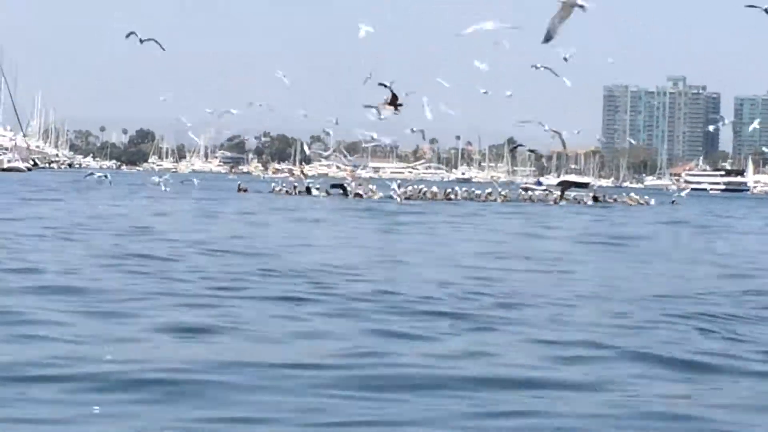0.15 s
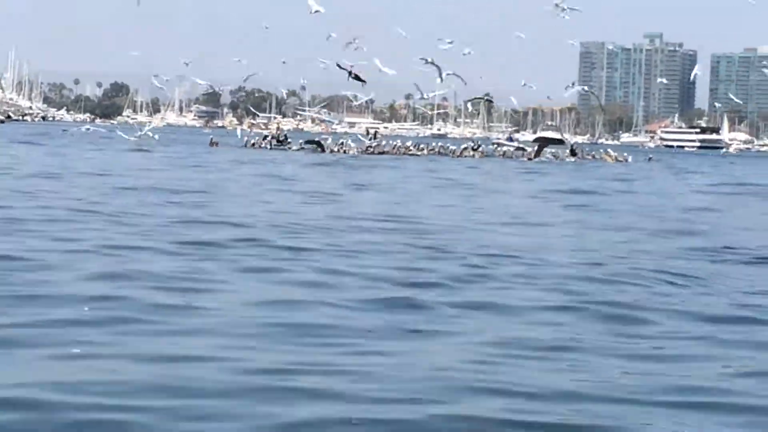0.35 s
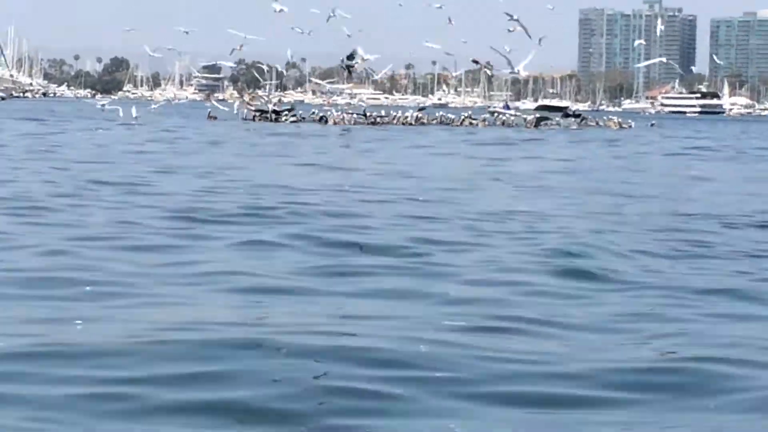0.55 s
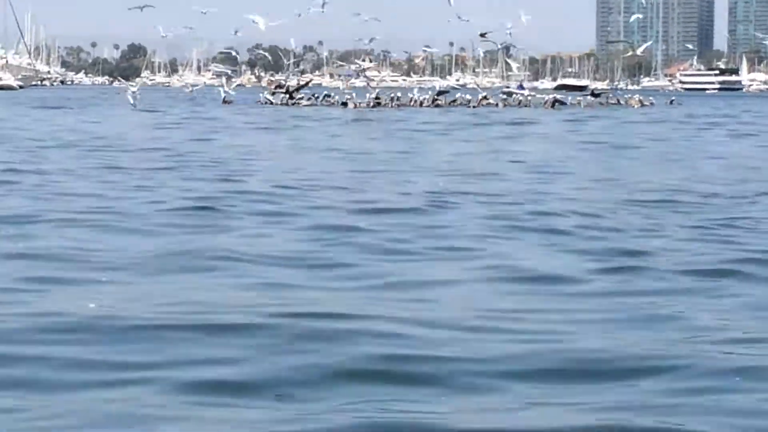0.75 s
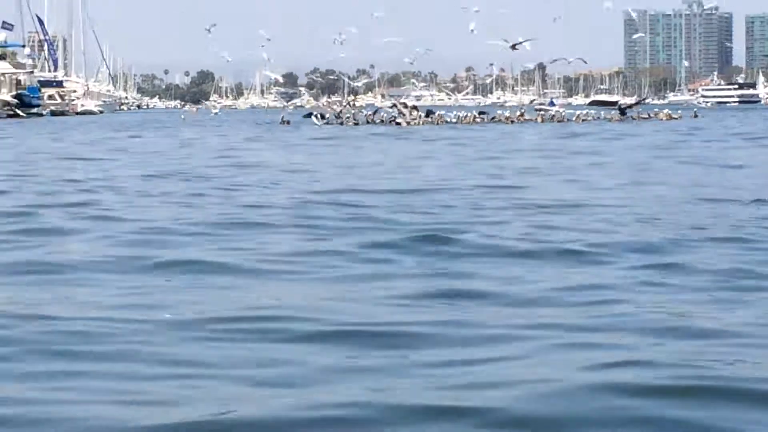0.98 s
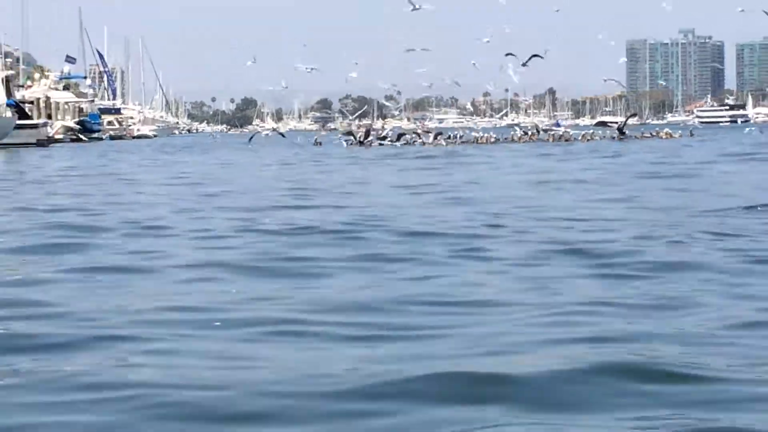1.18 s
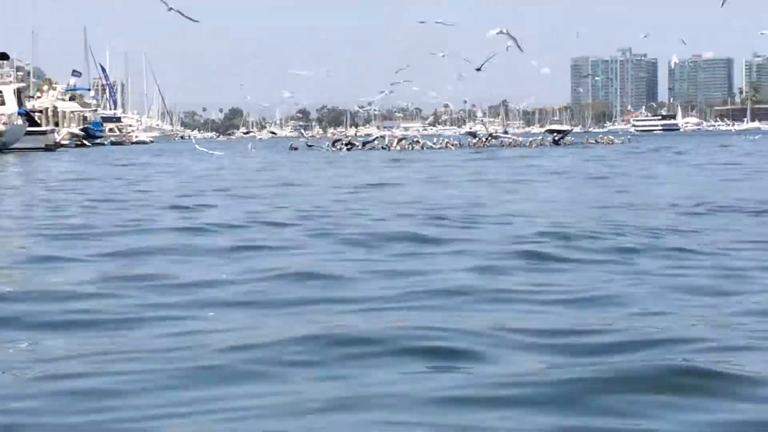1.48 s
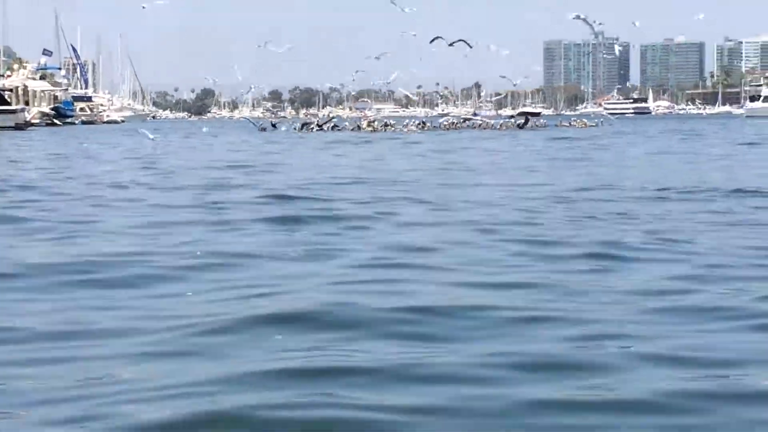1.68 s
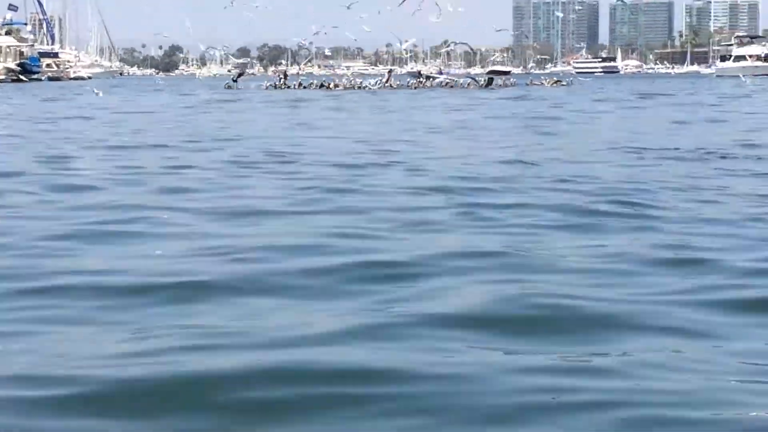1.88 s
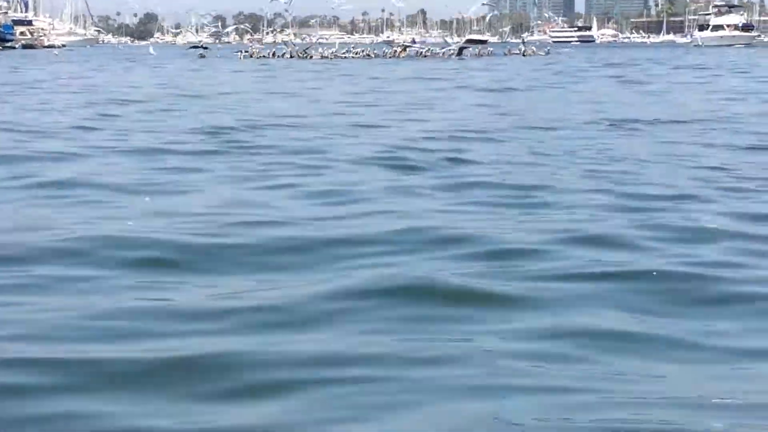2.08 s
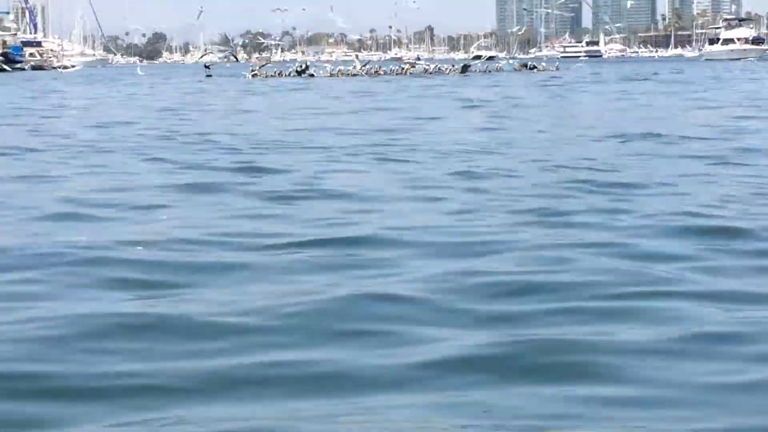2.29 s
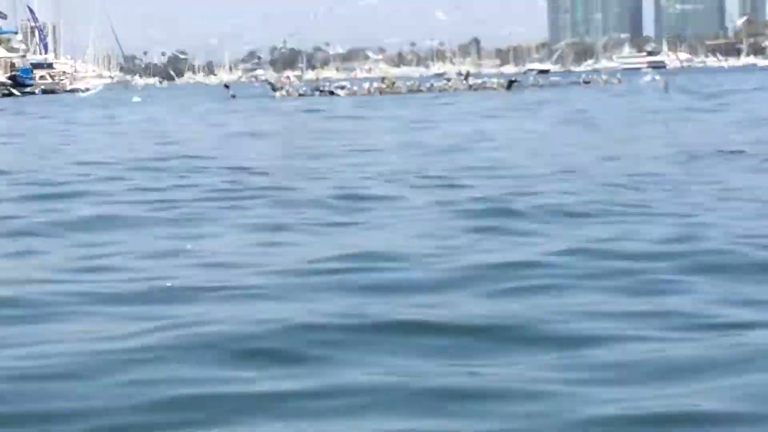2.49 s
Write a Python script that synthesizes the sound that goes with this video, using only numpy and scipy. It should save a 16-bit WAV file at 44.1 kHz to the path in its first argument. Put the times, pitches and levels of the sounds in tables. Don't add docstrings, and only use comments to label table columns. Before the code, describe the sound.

Gulls and terns squawk and chirp in a busy crowd above lapping water and buffeting wind

```python
import sys
import numpy as np
from scipy import signal
from scipy.io import wavfile
from scipy.ndimage import uniform_filter1d

SR = 44100
rng = np.random.default_rng(int(sys.argv[2]) if len(sys.argv) > 2 else 0)


def ratio_of_db(decibels):
    return 10 ** (np.asarray(decibels, float) / 20)


def transcribe(u):
    v = np.clip(np.atleast_2d(u).T, -1, 1)
    q = np.round(v * 32767).astype(np.int16)
    wavfile.write(sys.argv[1], SR, q)


N = 116865
QUICK_EDGE_S = 0.002024
ARCH_PER_S2 = 170

# start in seconds, length in seconds, pitch in Hz, level in dB,
# beak resonance in Hz.
ARCHED_CRIES = [(0.062, 0.048, 1180, -52.5, 6160), (0.51, 0.06, 2618, -41, 5250),
                (0.742, 0.035, 1341, -33.5, 5470), (0.911, 0.046, 1225, -42, 3800),
                (1.139, 0.039, 2720, -36, 5000), (1.312, 0.054, 1190, -38.5, 3550),
                (1.343, 0.06, 2600, -38.5, 5250), (2.143, 0.056, 1150, -45.5, 3400),
                (2.414, 0.054, 1280, -51, 3850), (2.489, 0.032, 2620, -35, 4860),
                (2.629, 0.057, 1270, -52.5, 8350)]
# start in seconds, length in seconds, pitch in Hz, level in dB,
# beak resonance in Hz.
HOARSE_WAILS = [(0.192, 0.096, 1450, -41.5, 3935), (1.303, 0.033, 1300, -47.5, 4200),
                (2.2, 0.019, 1500, -43, 4000), (1.992, 0.0468, 2433, -35.5, 5650),
                (2.53, 0.0477, 1200, -54.5, 5200), (1.732, 0.03, 1330, -44.5, 2740),
                (.155, 0.038, 1440, -50.5, 2900), (0.5, 0.039, 2400, -58, 2900),
                (1.1, 0.062, 1600, -52, 1330), (1.85, 0.071, 1300, -41.5, 4800),
                (1.9, 0.095, 1242, -43, 3800)]
# start in seconds, length in seconds, pitch in Hz,
# level in dB, beak resonance in Hz.
HELD_NOTES = [(0, 0.018, 1280, -49.5, 4100), (0.378, 0.017, 3180, -52, 3200),
              (0.154, 0.0284, 1409, -42, 4300), (0.247, 0.067, 1398, -48, 3700),
              (0.283, 0.057, 2730, -53, 5200), (1.416, 0.041, 2440, -45, 3970),
              (1.527, 0.043, 2770, -45, 5600), (1.579, 0.047, 1204, -40.5, 4470),
              (1.628, 0.095, 1452, -55.5, 5260), (1.869, 0.026, 1326, -31, 3530),
              (1.925, 0.034, 2512, -29.5, 2730), (2.299, 0.052, 2600, -40, 4640)]
# start in seconds, length in seconds, pitch in Hz, level in dB,
# beak resonance in Hz.
FALLING_GLIDES = [(0.412, 0.017, 3040, -46, 3300), (0.758, 0.023, 1344, -35.5, 4050),
                  (1.33, 0.021, 1340, -34.5, 4060), (1.395, 0.019, 2325, -40, 3840),
                  (1.478, 0.026, 2430, -38.5, 4760), (1.492, 0.02, 1169, -35.5, 3560),
                  (1.495, 0.011, 2820, -40.5, 5450), (1.572, 0.022, 2640, -51, 4500),
                  (1.814, 0.022, 1193, -32, 2650), (1.852, 0.018, 1182, -32, 2500),
                  (1.94, 0.032, 1213, -37, 3250), (1.944, 0.0233, 3050, -46.5, 6100),
                  (2.046, 0.021, 1040, -42, 3280), (2.208, 0.013, 1216, -33.5, 4700),
                  (2.338, 0.017, 1115, -37, 3840), (2.37, 0.017, 2290, -39.5, 3660),
                  (2.512, 0.021, 1169, -40, 3830)]
# start in seconds, length in seconds, pitch in Hz, level in dB,
# beak resonance in Hz.
RISING_GLIDES = [(0.57, 0.0093, 1310, -40.5, 4970), (1.273, 0.0088, 1080, -41.5, 3180),
                 (1.292, 0.0069, 1260, -39, 3800), (1.31, 0.012, 1365, -38, 4140),
                 (1.37, 0.011, 1282, -32.5, 3850), (1.41, 0.0072, 1147, -30.5, 3430),
                 (1.455, 0.027, 2850, -48, 5660), (1.785, 0.013, 1268, -38.5, 2440),
                 (2.182, 0.016, 1312, -37.5, 4300), (2.28, 0.0096, 1117, -37, 3940),
                 (2.315, 0.021, 1274, -36.5, 4450)]
# start in seconds, pitch in Hz, level in dB, beak resonance in Hz.
PIPS = [(0.127, 1310, -43, 4070), (.269, 1220, -48, 3700), (.313, 1186, -47, 2410),
        (.339, 1230, -49, 3600), (1.26, 2160, -50, 2180), (0.14, 1444, -45, 4370),
        (0.591, 2500, -34.5, 5030), (0.624, 2348, -36.5, 4020), (0.654, 2173, -36, 2450),
        (0.677, 2144, -35, 2400), (0.703, 1240, -42, 4930), (0.726, 1117, -40.5, 4240),
        (0.782, 1150, -41, 4360), (1.355, 2160, -40, 3130), (1.387, 1210, -43, 3720),
        (1.428, 1166, -38, 3540), (1.448, 1212, -41, 4160), (1.459, 1168, -33, 3700),
        (1.512, 1137, -39.5, 3280), (1.544, 1168, -37, 3650), (1.56, 1110, -37, 2950),
             (1.623, 1121, -39, 3500), (1.64, 1112, -46, 4250), (1.68, 1347, -48, 5160),
             (1.698, 1290, -41.5, 4340), (1.722, 1377, -47.5, 5460), (1.785, 1966, -42, 2090),
             (1.824, 1980, -36, 1950), (1.86, 1940, -39, 1950), (2.037, 2305, -43, 4700),
             (2.244, 1127, -49, 3500), (1.836, 1234, -31, 2730), (1.897, 2207, -27, 2370),
             (1.916, 2400, -27, 3380), (1.973, 2304, -25.5, 2860), (2.229, 1170, -34, 3180),
             (2.261, 1196, -33.5, 4450), (2.351, 1268, -35, 4530), (2.405, 2160, -40.5, 3100),
             (2.429, 2067, -42, 2880), (2.454, 2200, -42.5, 2950), (2.474, 1222, -39, 4200)]
# frequency in Hz, gain in dB.
THROAT_RESPONSE = [(1000, -9.5), (2000, 3), (5500, 5), (6300, -2), (15000, -13)]
# frequency in Hz, level in dB.
WASH_SPECTRUM = [(170, -18), (300, -0.5), (830, -15), (2100, -18), (9000, -33), (15400, -45)]
# start in seconds, peak in dB, pitch in Hz.
PLOPS = [(0.123, -29, 705), (0.475, -23.5, 920), (0.483, -25, 793), (1.023, -35.5, 970), (1.134, -32, 1590),
         (.34, -33, 1290), (0.367, -35.5, 1520), (.96, -34.5, 1170), (1.746, -36, 910), (2.198, -27, 610),
         (.81, -33.5, 700)]
# start in seconds, peak in dB.
SPRAY_TICKS = [(.115, -48), (.1251, -39), (.37, -47), (.451, -43), (.859, -49), (.984, -45), (.999, -50),
               (1.017, -48), (1.0312, -41), (1.063, -49), (1.092, -49), (1.108, -44), (1.135, -45),
               (2.135, -49), (2.423, -47)]
# time in seconds, gust level in dB.
WIND_GUSTS = [(0, -37.5), (.23, -39), (.29, -29.5), (.47, -38.5), (0.508, -30.5), (.56, -37), (.84, -30),
              (.97, -38.5), (1.519, -38), (1.8, -30), (1.95, -25.5), (2.05, -36.5), (2.24, -33.5),
              (2.4, -41)]
# frequency in Hz, level in dB.
RUMBLE_SPECTRUM = [(20, -28), (74, 1.5), (195, -1.5), (900, -41.5)]
# start in seconds, peak in dB, pitch in Hz.
WIND_BUFFETS = [(0.161, -37, 150), (0.27, -27, 132.4), (0.496, -25, 108), (0.59, -27.5, 183),
                (0.651, -27, 131), (1.052, -32, 145), (1.287, -29, 104.4), (1.358, -32, 104),
                (1.429, -31.5, 91.5), (1.596, -26, 142), (1.925, -15.5, 125), (2.198, -25.5, 90),
                (2.562, -33, 96.9),
                (0.701, -28.5, 260),
    (0.724, -23, 246),
    (1.629, -40, 198),
    (1.72, -33, 199),
    (1.77, -26, 170),
    (1.94, -25.5, 149),
]


def evened(x):
    return x / np.sqrt(np.mean(x ** 2) + 1e-20)


def read(points, hz):
    f, value = np.transpose(points)
    return np.interp(np.log(hz + 1), np.log(f + 1), value)


def add(mix, start_s, sound):
    part = mix[round(start_s * SR):][:len(sound)]
    part += sound[:len(part)]


def drift(count, size):
    smooth = uniform_filter1d(rng.standard_normal(count), size)
    return uniform_filter1d(smooth, size) * np.sqrt(1.5 * size)


def band(x, lo_hz, hi_hz):
    sos = signal.butter(2, [lo_hz, min(hi_hz, 20000)], "band", fs=SR, output="sos")
    return signal.sosfilt(sos, x)


def noise(points, patchy_db, flicker_db, size):
    frames, hz = 4 * N // size + 5, np.fft.rfftfreq(size, 1 / SR)
    a, b, patches = rng.standard_normal((frames, len(hz), 3)).T
    patches = uniform_filter1d(patches, size=8, axis=0)
    patches = evened(uniform_filter1d(patches, size=6, axis=1))
    flicker = evened(uniform_filter1d(rng.standard_normal(frames), size=3))
    level_db = read(points, hz)[:, None] + patchy_db * patches + flicker_db * flicker
    z = (a + 1j * b) * ratio_of_db(level_db)
    return evened(signal.istft(z, nperseg=size, noverlap=3 * size // 4)[1][:N])


def note(length, hz, db, mouth_hz, arch=0., droop=0., slide=0., edge_s=QUICK_EDGE_S,
         breath_db=-11, rough=1, above_db=-11, mouth_db=6.5):
    wobble, flutter, rasp = (drift(count=4410, size=s) for s in (160, 90, 14))
    air = signal.lfilter([1, -1], [1, -.6], rng.standard_normal(4410))
    t = np.arange(0, min(length + edge_s, .1), 1 / SR) - edge_s / 2
    n = len(t)
    from_middle = t - length / 2

    bend = 1 - arch * from_middle ** 2 + slide * from_middle
    bend = bend - droop * (np.clip(t / length, 0, 2) ** 5 - .1)
    pitch = hz * (bend + rough * 0.0146 * wobble[:n])
    phase = 2 * np.pi * np.cumsum(pitch) / SR

    k = np.arange(1, 13)[:, None]
    octaves = np.log2(k * hz / mouth_hz)
    beak_db = mouth_db * np.exp(-(octaves / 0.19) ** 2) + above_db * np.maximum(octaves, 0)
    heights = ratio_of_db(read(THROAT_RESPONSE, k * pitch) + beak_db) * (k * pitch < 16000)
    stack = (heights * np.cos(k * phase + rng.uniform(0, 5.44, k.shape))).sum(0)

    ramp = np.minimum(t - t[0], (t[-1] - t) / 1.65) / edge_s
    shape = np.sin(np.pi / 2 * np.clip(ramp, 0, 1))
    breath = ratio_of_db(breath_db) * band(air, mouth_hz / 2, 2 * mouth_hz)[:n]
    voice = evened(stack) * (1 + rough * 0.25 * rasp[:n]) + breath
    return ratio_of_db(db + rough * 3 * flutter[:n]) * shape * voice


def flock():
    mix = np.zeros(N)
    for start, length, *voice in ARCHED_CRIES:
        cry = note(length, *voice, mouth_db=12, arch=ARCH_PER_S2, edge_s=.8 * length / 2, rough=.3,
                   breath_db=-23, above_db=-4)
        add(mix, start - .09 * length, cry)
    for start, *voice in HOARSE_WAILS:
        add(mix, start, note(*voice, arch=60, edge_s=0.0052, rough=.7, breath_db=-23))
    for start, *voice in HELD_NOTES:
        add(mix, start, note(*voice, droop=0.084, rough=.6, edge_s=0.0065, breath_db=-50))
    for table, slide in ((FALLING_GLIDES, -6.5), (RISING_GLIDES, 7.6)):
        for start, *voice in table:
            add(mix, start, note(*voice, slide=slide))
    for start, *voice in PIPS:
        add(mix, start, note(0.011, *voice, slide=-2.5))
    return np.roll(mix, -round(QUICK_EDGE_S / 2 * SR))


def crowd():
    mix = np.zeros(N)
    birds, birds_per_s, crowd_db = 120, 53, -61.5
    for when, long, high, loud, wide in rng.random((birds, 5)):
        length = 0.01 + 0.0511 * long ** 2
        cry = note(length, 1100 + 350 * high, crowd_db + 6 * (loud - .5), 2300 + 2500 * wide,
                   arch=ARCH_PER_S2, edge_s=0.0055)
        add(mix, when * birds / birds_per_s, cry)
    return mix


def open_water(x):
    t60_s, echo_db = 0.22, -8.5
    t = np.arange(SR // 3) / SR
    sparse = rng.standard_normal(len(t)) * (rng.random(len(t)) < .05)
    taps = sparse * ratio_of_db(-60 * t / t60_s) * (t > .002)
    echoes = signal.fftconvolve(band(x, 900, 3800), taps / np.linalg.norm(taps))[:N]
    return x + ratio_of_db(echo_db) * echoes


def splash():
    u = np.linspace(0, 1, round(.07 * SR))
    grains = rng.standard_normal((2, 4410)) * ratio_of_db(5 * drift(count=4410, size=60))
    slosh = evened(band(grains[0], 420, 2900))[:len(u)]
    fizz = evened(band(grains[1], 4900, 9500))[:len(u)]
    return ratio_of_db(-41) * np.sin(np.pi * u) ** 0.22 * slosh + ratio_of_db(-47) * np.sin(np.pi * u ** 2) ** 2 * fizz


def water():
    mix = ratio_of_db(-45.5) * noise(WASH_SPECTRUM, patchy_db=3.5, flicker_db=1.1, size=512)
    t = np.arange(600) / SR
    for start, db, hz in PLOPS:
        ring = np.sin(2 * np.pi * hz * t * (1 + 14 * t))
        add(mix, start, ratio_of_db(db - 60 * t / 0.018) * np.minimum(t / 0.0011, 1) * ring)
    for start, db in SPRAY_TICKS:
        add(mix, start, ratio_of_db(db - 60 * t / 0.013) * band(rng.standard_normal(len(t)), 1500, 13300))
    add(mix, .446, splash())
    return mix


def wind():
    s, db = np.transpose(WIND_GUSTS)
    buffets, cycles = np.zeros(N), 3.1
    for start, peak_db, hz in WIND_BUFFETS:
        u = np.arange(0, 1, hz / cycles / SR)
        swell = np.sin(np.pi * u ** 1.2) ** 2
        add(buffets, start, ratio_of_db(peak_db + 0.5) * swell * np.sin(2 * np.pi * cycles * u))
    turbulence = noise(RUMBLE_SPECTRUM, patchy_db=1.5, flicker_db=2.0, size=2048)
    gust = ratio_of_db(-1 + np.interp(np.arange(N) / SR, s, db))
    return buffets + gust * evened(band(turbulence, 7.5, 1360))


def scene():
    return (open_water(flock() + crowd()) + wind() + water())[None]


def top_cut(x):
    return signal.sosfilt(signal.butter(12, 15350, fs=SR, output="sos"), x)


def record(dry):
    knee_db, squeeze = -30, 0.6
    power_db = 10 * np.log10(uniform_filter1d(dry ** 2, size=6000) + 1e-12)
    mix = dry / ratio_of_db(squeeze * np.maximum(power_db - knee_db, 0))
    return top_cut(mix)


dry = scene()
out = record(dry)
transcribe(out)
```